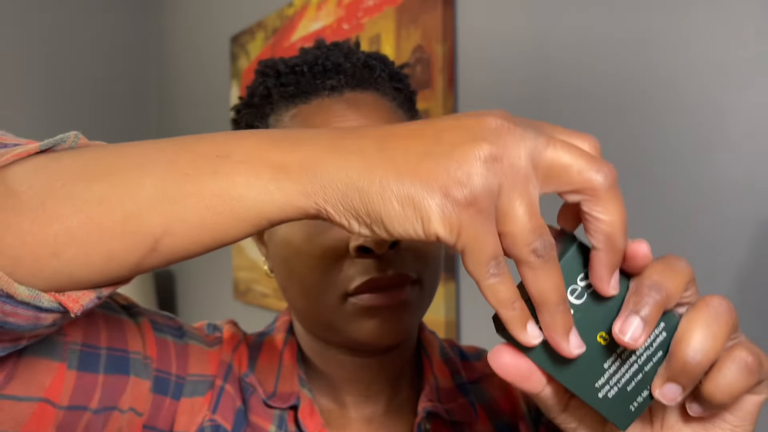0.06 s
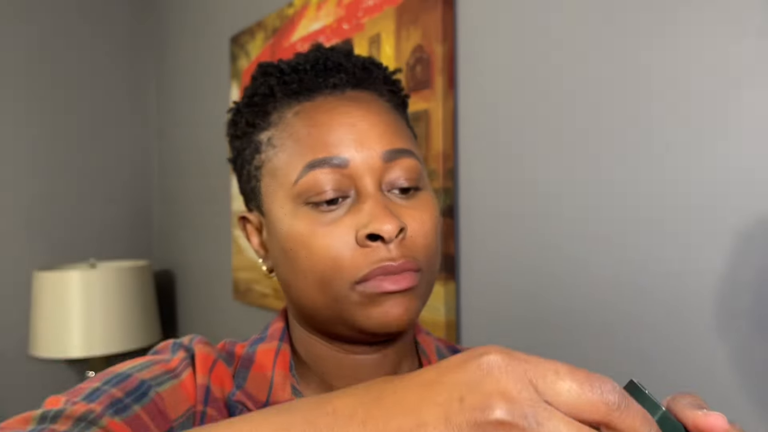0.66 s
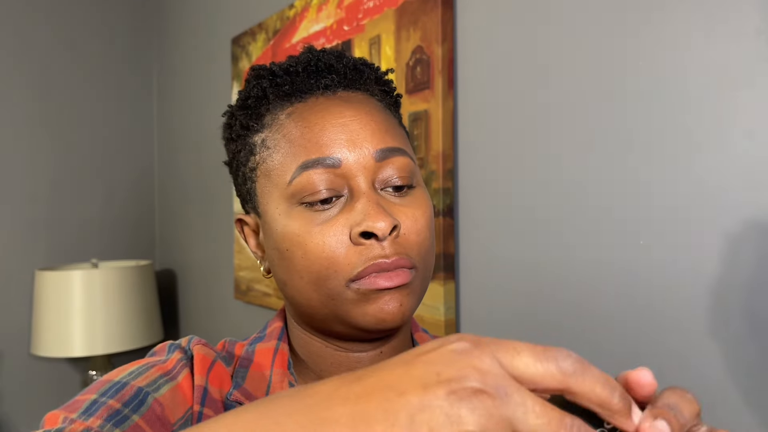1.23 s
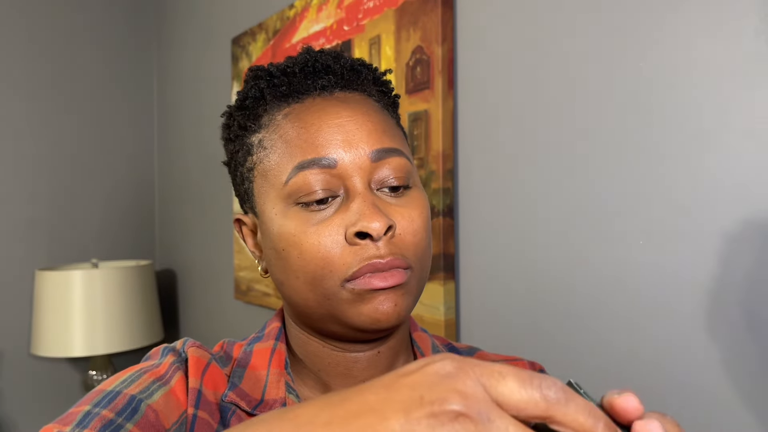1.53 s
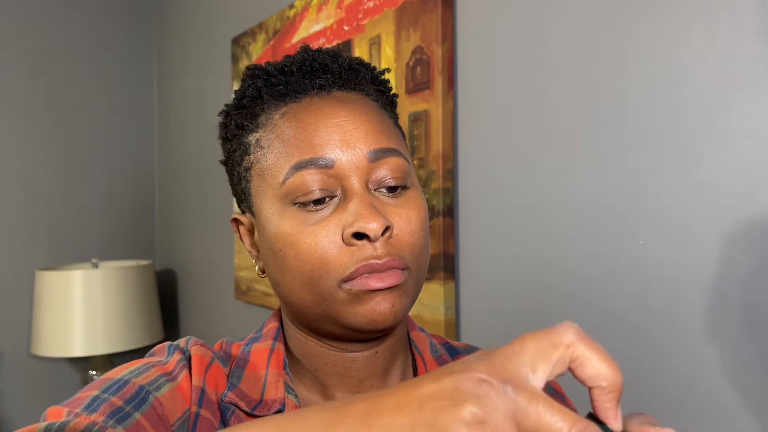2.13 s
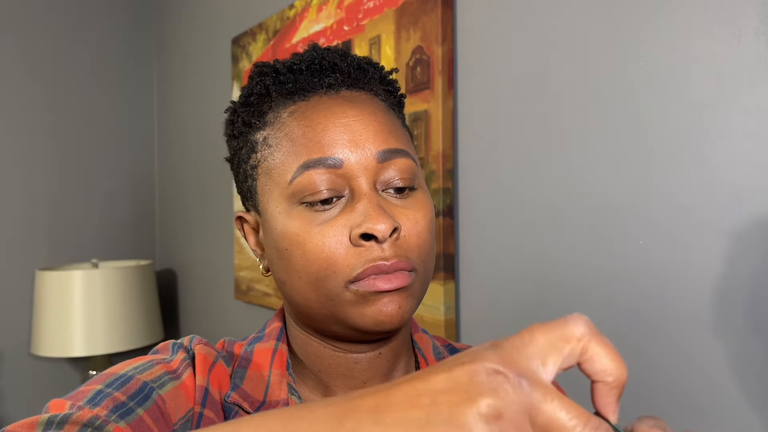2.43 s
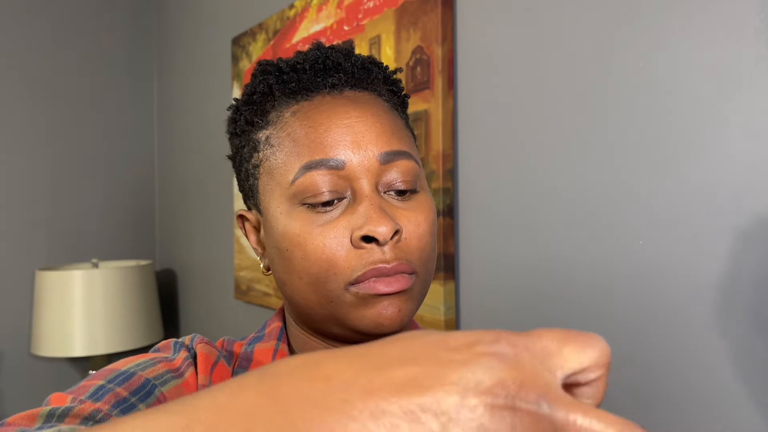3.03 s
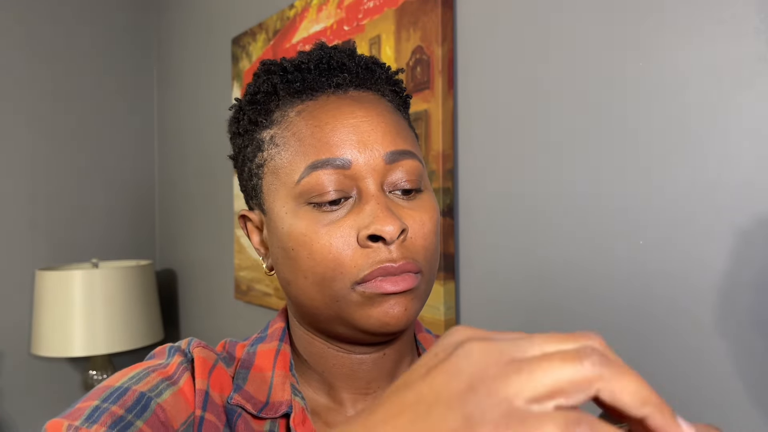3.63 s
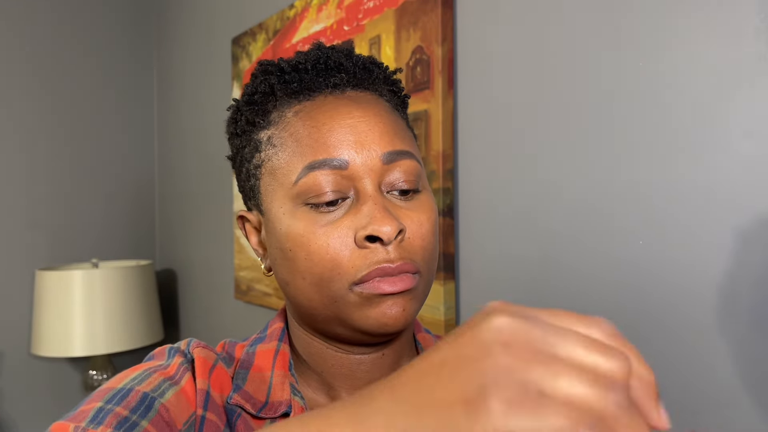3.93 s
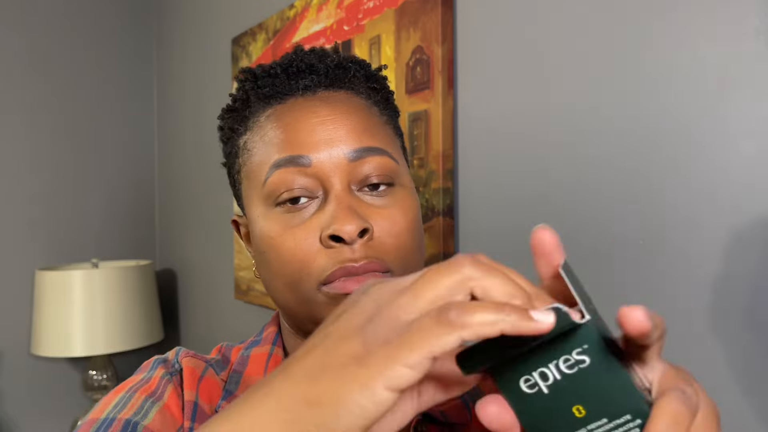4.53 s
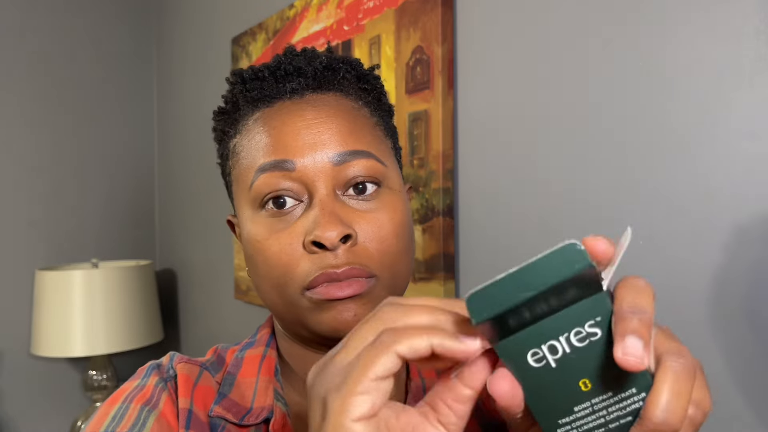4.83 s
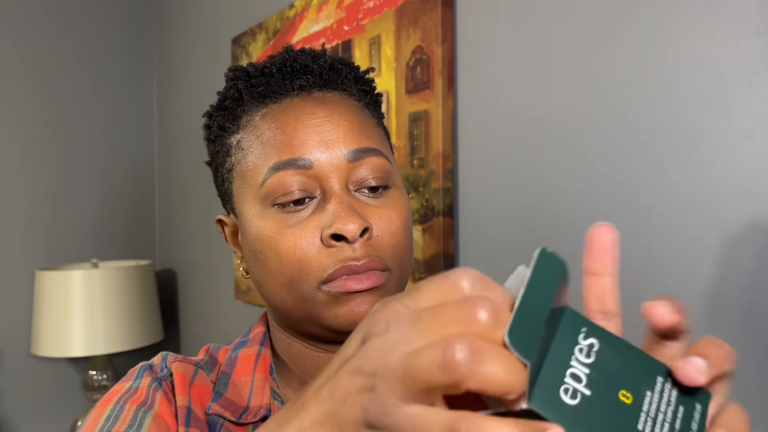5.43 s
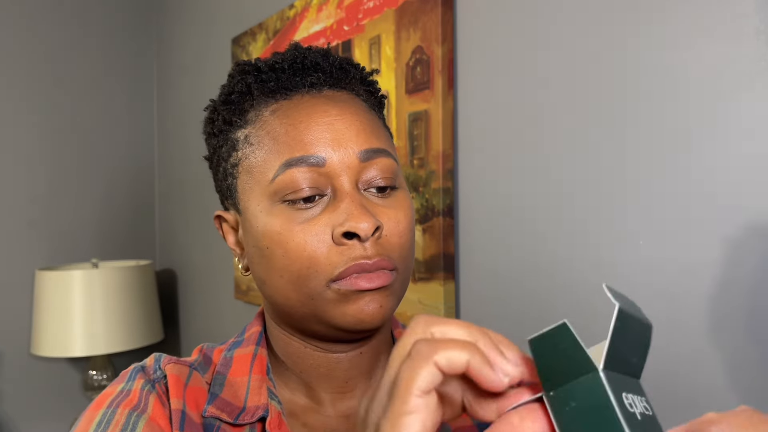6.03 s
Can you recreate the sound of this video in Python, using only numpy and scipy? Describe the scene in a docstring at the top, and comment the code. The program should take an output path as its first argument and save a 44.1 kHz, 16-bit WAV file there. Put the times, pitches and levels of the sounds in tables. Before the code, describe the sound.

Fingertips tick and slide softly on a small cardboard box, heard up close in a quiet room. Partway through, the flaps snap free with crisp, slightly hollow clicks and a tab scrapes through its slot. The handling grows busier, with papery rustling, brief squeaks, more snaps and dull bumps into a palm. The walls give a very short echo above a faint, steady low rumble.

```python
"""In a quiet furnished room, two hands work open a small cardboard box close to a phone.
Flaps snap free, tabs scrape through their slots and fingertips tap; each contact makes the stiff
panels, the cut edges and the hollow of the box ring. Sliding fingers rustle and hiss, the card
squeaks as it sticks and slips, and the box thuds softly into a palm.
The walls answer briefly, over a faint rumble of air."""
import sys
import numpy as np
from scipy import signal
from scipy.fft import rfft, irfft
from scipy.io import wavfile
from scipy.ndimage import uniform_filter1d

SR = 44100
rng = np.random.default_rng(int(sys.argv[2]) if len(sys.argv) > 2 else 0)


def output_pcm(signal):
    """Save a mono or channel-first signal as 16-bit PCM at the path in sys.argv[1].

    Samples are clipped to [-1, 1] before scaling.
    """
    pcm = np.clip(np.atleast_2d(signal).T, -1, 1) * 32767
    wavfile.write(sys.argv[1], SR, np.round(pcm).astype(np.int16))


N = 277031
TIME = np.arange(N) / SR
CONTACT_TIME = TIME[:4096]  # seconds, long enough for one contact to die away

# the tones at which the panels ring as they bend: f/Hz, width/Hz, level/dB
PANEL_TONES = [(1590, 56, -0.5), (1860, 64, -3.5), (2116, 650, -2), (2612, 73, 0), (3045, 320, 7),
               (3096, 570, 7.5), (3313, 640, 5), (3980, 330, -4), (4170, 340, -8)]


def flaps():
    """Flaps snap free and fingers tap firmly on the box."""
    # t/s, panel level/dB, f/Hz of the hollow or flap, hollow level/dB, edge level/dB
    # (the last two are relative to the panel)
    flap_snaps = [(0.2702, -56, 1620, -12, 2), (0.36, -53.5, 850, 0.5, -13),
                  (0.6105, -50.5, 830, -2.5, -9.5), (0.7265, -52.5, 910, -3.5, -5),
                  (0.9805, -41.5, 1150, -3.5, -4.5), (1.2322, -58, 690, 0.5, -2),
                  (1.3318, -44.5, 790, 2.5, -6), (1.477, -51, 390, -1, -3), (1.5933, -50, 873, 6.5, -7),
                  (2.0524, -56.5, 770, -6, -4), (2.0683, -43.5, 866, 3.5, 0),
                  (2.254, -48.5, 1100, -7, -5.5), (2.299, -59.5, 850, 4.5, -6), (2.459, -61.5, 1490, 3, 0),
                  (2.5021, -41, 1410, 3.5, -5.5), (2.5784, -30, 750, -1.5, -2.5),
                  (2.6323, -22.5, 843, -4.5, -7.5), (2.6464, -26, 876, 2.5, -7),
                  (2.9065, -21.5, 1450, -2, -8), (3.0109, -28, 815, -7, -5.5),
                  (3.1296, -42.5, 810, -9.5, -5), (3.2118, -42, 1950, -1.5, -20),
                  (3.2497, -43.5, 1400, -6, -7), (3.2813, -36.5, 1570, 3.5, -14),
                  (3.3699, -41, 1390, -4, -1.5), (3.8187, -43, 880, 3.5, -24),
                  (3.8361, -52.5, 1220, 2, -0.5), (3.9165, -26, 1455, 5.5, -2),
                  (3.9226, -25.5, 1434, -0.5, -13), (3.9388, -40, 1480, -1, -18),
                  (3.9577, -43, 1600, 3, -3.5), (4.045, -47.5, 1440, -4, -6), (4.1689, -46, 1310, -4, -1),
                  (4.3612, -42.5, 785, 1, -8.5), (4.9612, -52, 676, -1.5, -8), (5.2253, -47, 1760, 5, -10),
                  (5.3215, -29, 1436, 0, -6.5), (5.326, -52, 704, 5, 4), (5.3894, -41.5, 1140, 1, 0),
                  (5.4135, -47, 1570, -10, 1), (5.4545, -43, 1090, 1.5, -7),
                  (5.4874, -39.5, 1280, -4.5, -9), (5.528, -41.5, 657, -7, -8),
                  (5.5416, -48.5, 1660, 7, -19), (5.562, -50, 1180, 4, -3), (5.5711, -43, 1190, -6, -15),
                  (5.6583, -49.5, 1780, 5, -4), (5.6847, -50.5, 1220, 4.5, -2.5),
                  (5.9618, -51.5, 1270, 3.5, -5), (6.0539, -43, 2230, -3, -17),
                  (6.062, -38, 1520, 1, -15.5), (6.1169, -32, 2365, -1, -16),
                  (6.157, -35.5, 2250, -2.5, -10), (6.2102, -41.5, 1180, -5.5, -6.5)]
    return snaps(flap_snaps)


def snaps(rows, lead_s=0.006, kick_s=0.00008, rise_s=0.00036, crack_s=0.0024, flutter_s=0.03):
    """A fold strains, gives way with one smooth kick and cracks briefly; the flap flutters to rest."""
    out = np.zeros(N)
    t = CONTACT_TIME - lead_s
    after = np.maximum(t, 0)
    strain = undb(-14) * np.exp(-np.abs(t) / 0.002)
    kick = 3.2 * np.exp(-0.5 * ((t - rise_s) / kick_s) ** 2)
    flutter = undb(-22) * np.exp(-after / flutter_s)
    crack = (1 - np.exp(-after / rise_s)) * (np.exp(-after / crack_s) + flutter)
    for start, db, *tone in rows:
        push = kick + (strain + crack) * rng.standard_normal(len(t))
        add(out, start - lead_s, box_ring(push, db, *tone, length_s=0.01))
    return out


def scrapes(fade_s=0.0047, slips_per_s=2200):
    """A tab drags through its slot: a short, dense run of tiny slips shakes the box."""
    # t/s, length/s, panel level/dB, hollow f/Hz, hollow level/dB, edge level/dB
    # (the last two are relative to the panel)
    tab_drags = [(0.893, 0.013, -53.5, 734, 6, -4.5), (0.921, 0.12, -57, 890, 1, -17),
                 (2.078, 0.033, -51.5, 884, 5.5, -2.5), (2.306, 0.0095, -44.5, 856, 1.5, -0.5),
                 (2.867, 0.031, -34, 1440, -4, 4.5), (2.877, 0.041, -30, 1430, -7.5, -3),
                 (3.315, 0.017, -37.5, 1510, -12, -28), (3.438, 0.021, -39.5, 1390, -12, -5),
                 (4.414, 0.024, -55, 1450, 13, -3), (4.649, 0.029, -52.5, 1410, 2, 1.5),
                 (4.762, 0.017, -39, 1450, -3, -12), (5.125, 0.044, -35, 1400, -2.5, -4.5),
                 (5.976, 0.019, -47, 1390, 2, 0.5)]
    out = np.zeros(N)
    t = CONTACT_TIME
    for start, length, db, *tone in tab_drags:
        pressure = (1 - np.exp(-t / fade_s)) * np.exp(-np.maximum(t - length, 0) / fade_s)
        slips = fibre_clicks(len(t), slips_per_s, spread_db=1.2) + 0.5 * rng.standard_normal(len(t))
        add(out, start, box_ring(pressure * slips, db, *tone, length_s=length))
    return out


def box_ring(push, db, hollow_hz, hollow_db, edge_db, length_s, firm_db=-39.5):
    """A push rings the panels, the hollow or a free flap, the box's soft bulk, its edges and fibres."""
    # the tones of the cut edges and folds: f/Hz, width/Hz, level/dB
    edge_tones = [(4310, 870, -0.5), (4910, 1460, 1), (5560, 1040, 2.5), (6280, 250, -0.5),
                  (6800, 2700, -6)]
    # the finest crackle of the paper fibres: f/Hz, width/Hz, level/dB
    fibre_tones = [(8460, 1250, 11.5), (9030, 300, 4), (9000, 160, 2.5), (10700, 5400, -23.5),
                   (11530, 940, -12.5), (13900, 1200, -44.5)]
    panel = band(ring_tones(push, PANEL_TONES), 1180, 4500)
    hollow = ring(push, hollow_hz, width_hz=140) + 0.19 * band(push, 657, 2030)
    hollow = ring(hollow, hollow_hz, width_hz=1200)
    thump = ring(push, 470, width_hz=135) + 0.21 * band(push, 113, 590)
    edge = band(ring_tones(push, edge_tones), 3660, 7160)
    fibre = band(ring_tones(push, fibre_tones), 4500, 20000)
    thump_db = -17.5 - 0.4 * (db - firm_db)  # gentle touches use the soft finger pad: more thump
    fibre_db = -5 + 1.56 * edge_db  # in sharper contacts the fibres grow faster than the edges
    sound = unit(panel)
    for part, part_db in (hollow, hollow_db), (thump, thump_db), (edge, edge_db), (fibre, fibre_db):
        sound = sound + undb(part_db) * unit(part)
    return undb(db) * sound * np.sqrt(length_s * SR / len(push))  # the level counts over length_s


def sliding_fingers(card_gain, hiss_gain, catches_per_s=160):
    """Skin slides with uneven pressure, hissing on the print and catching so that the card rings."""
    # the rustle of the box under a sliding finger: f/Hz, level/dB
    rustle_curve = [(150, -9), (450, -23.5), (750, -1.5), (1100, -5.5), (1480, 9.5), (1750, 0.5), (2300, 2),
                    (3200, 5), (3900, 1), (4600, -10), (7000, -9.5), (16000, -60)]
    # the hiss of skin on the smooth print: f/Hz, level/dB
    hiss_curve = [(1000, -27), (3000, -3), (3900, -2), (4600, -12.5), (5200, -0.5), (6100, 1), (7300, -5.5),
                  (8500, -4.5), (10300, -12), (11800, -15), (15500, -23.5)]
    grip_db = 2.5 * wander(110) + 1.7 * wander(28)  # the fingertip shakes quickly and leans slowly
    catches = fibre_clicks(N, catches_per_s, spread_db=3)
    ticks = ring_tones(catches, PANEL_TONES) + 2.2 * ring(catches, 842, 103)
    ticks = unit(ticks + 1.65 * ring(catches, 1180, 220))
    rustle = unit(friction(rng.standard_normal(N), rustle_curve) + 0.54 * ticks)
    hiss = friction(rng.standard_normal(N) + 0.15 * catches, hiss_curve)
    lightness = hiss_gain ** 2 / (hiss_gain ** 2 + card_gain ** 2)
    airy_hiss = unit(band(rng.standard_normal(N), 8200, 14500))
    hiss = hiss + undb(-16) * lightness * airy_hiss  # a lighter touch sounds airier
    return card_gain * undb(grip_db) * rustle + hiss_gain * undb(grip_db / 2) * hiss


def stroke_gains(rest_card_db=-68, rest_hiss_db=-73.5, attack_share=0.25, swell_db=1.5, release_s=0.019):
    """How loud the rustle and hiss are: each stroke takes hold, grows as it presses on, and lets go."""
    # finger strokes along the box: t/s, length/s, card level/dB, hiss level/dB
    strokes = [(0, 0.026, -57, -62.5), (0.09, 0.17, -61, -62.5), (0.248, 0.19, -58.5, -57.5),
               (0.5, 0.082, -70, -61), (0.892, 0.1, -53.5, -52), (1.071, 0.11, -62.5, -55.5),
               (1.394, 0.095, -68, -65), (1.782, 0.067, -64, -52.5), (2.53, 0.032, -55, -51),
               (2.786, 0.026, -62.5, -55.5), (3.133, 0.18, -50.5, -56.5), (3.28, 0.19, -50.5, -48.5),
               (3.535, 0.061, -51.5, -56), (3.624, 0.065, -63, -62), (3.777, 0.018, -63, -62),
               (3.873, 0.045, -47, -61), (4.04, 0.15, -51, -53.5), (4.288, 0.18, -53, -59),
               (4.484, 0.2, -52.5, -50.5), (4.694, 0.11, -53, -61), (4.902, 0.099, -53.5, -54.5),
               (5.032, 0.1, -48, -58), (5.14, 0.17, -45, -56.5), (5.335, 0.28, -56.5, -63.5),
               (5.613, 0.068, -50, -56.5), (5.706, 0.15, -59, -66), (5.845, 0.092, -54, -58),
               (6.097, 0.12, -52, -53.5)]
    card_power = np.full(N, undb(rest_card_db) ** 2)  # the hands are never quite still
    hiss_power = np.full(N, undb(rest_hiss_db) ** 2)
    t = TIME[:SR // 2]
    for start, length, card_db, hiss_db in strokes:
        attack = np.minimum(t / (attack_share * length), 1) ** 0.64
        swell = undb(swell_db * (np.minimum(t / length, 1) - 1))
        release = np.exp(-np.maximum(t - length, 0) / release_s)
        shape = attack * swell * release
        add(card_power, start, (undb(card_db) * shape) ** 2)
        add(hiss_power, start, (undb(hiss_db) * shape) ** 2)
    return np.sqrt(card_power), np.sqrt(hiss_power)


def friction(noise, curve, drift_db=1.7, drifts_per_s=16):
    """Rubbing noise whose octaves each swell and fade as the finger moves over the card."""
    centres_hz = 375 * 2.0 ** np.arange(6)
    log_hz = np.log(np.maximum(np.fft.rfftfreq(N, 1 / SR), 1))
    spectrum = rfft(colour(noise, curve))
    out = np.zeros(N)
    for share in np.eye(len(centres_hz)):
        octave = irfft(spectrum * np.interp(log_hz, np.log(centres_hz), share), N)
        out += octave * undb(drift_db * wander(drifts_per_s))
    return unit(out)


def fibre_clicks(n, per_s, spread_db):
    """Fibres catch and let go: random clicks, many small and a few large."""
    when, size, sign = rng.random((3, n))
    strength = undb(spread_db * np.minimum(-np.log(1 - size), 4))
    return unit((when < per_s / SR) * np.sign(sign - 0.5) * strength)


def squeaks(width_hz=330):
    """The card sticks and slips, briefly locking onto one hoarse tone."""
    # each squeak: t/s, length/s, f/Hz, level/dB
    squeals = [(0, 0.02, 1920, -54), (0.163, 0.14, 3050, -63), (2.864, 0.042, 3310, -30.5),
               (3.009, 0.01, 4300, -37.5), (3.01, 0.019, 7350, -44.5), (3.899, 0.033, 3820, -39),
               (5.129, 0.037, 6200, -41.5), (5.211, 0.097, 1940, -49)]
    out = np.zeros(N)
    for start, length, hz, db in squeals:
        n = int(length * SR)
        slips = rng.standard_normal(SR)
        tone = ring(ring(slips, hz, width_hz), hz, 2 * width_hz)[:n]
        add(out, start, undb(db) * unit(tone * np.hanning(n) ** 0.5))
    return out


def light_taps(card_gain, taps_per_s=7, shut_hz=836, open_hz=1300, lid_opens_s=2.9):
    """Fingertips shift their grip with small random taps, which ring higher once the lid is open."""
    hollow_db, edge_db = 3, -3.5
    spacings, forces, pitches = rng.standard_normal((96, 3)).T
    gaps = np.exp(spacings / 2)
    starts = np.cumsum(gaps / gaps.mean()) / taps_per_s
    taps = []
    for start, force, pitch in zip(starts, forces, pitches):
        if start < TIME[-1]:
            rubbing_db = 20 * np.log10(card_gain[int(start * SR)])
            db = rubbing_db - 4.5 + 3.5 * force  # firmer rubbing brings louder taps
            hz = (shut_hz if start < lid_opens_s else open_hz) * np.exp(0.14 * pitch)
            taps.append((start, db, hz, hollow_db, edge_db))
    return snaps(taps)


def palm_bumps(decay_s=0.0061, bulk_hz=340):
    """The box lands in the soft palm with a short, dull thud that shakes its whole bulk."""
    # each landing: t/s, level/dB
    landings = [(2.64, -48.5), (3.917, -39), (5.3914, -50), (5.53, -55), (5.562, -51)]
    out = np.zeros(N)
    t = CONTACT_TIME
    for start, db in landings:
        thud = band(np.exp(-t / decay_s) * rng.standard_normal(len(t)), 65, 520)
        thud = thud + 1.5 * ring(thud, bulk_hz, width_hz=240)
        add(out, start, undb(db) * unit(thud) * np.sqrt(2 * decay_s * SR / len(t)))
    return out


def room(sound, build_s=0.0029, fade_60_db_s=0.31, tail_db=-10):
    """The sound arrives directly, then as a few wall echoes and a short, blurred tail."""
    # echoes from the nearby walls: delay/s, level/dB
    echoes = [(.0075, -17.5), (0.015, -33), (.025, -22), (.04, -32)]
    # the tone of the tail: f/Hz, level/dB
    tail_curve = [(100, -9), (450, 12.5), (850, 4), (1500, 5.5), (3600, 6), (6000, 8.5), (9000, 3.5),
                  (16000, 6.5)]
    t = TIME[:SR]
    tail = colour(rng.standard_normal(len(t)), tail_curve)
    tail *= undb(-60 * t / fade_60_db_s) * (1 - np.exp(-t / build_s))
    response = undb(tail_db) * tail / np.sqrt(np.sum(tail ** 2))
    response[0] += 1  # the direct sound
    for delay, db in echoes:
        response[int(delay * SR)] += undb(db)
    return signal.fftconvolve(sound, response)[:N]


def room_air(level_db=-56.5):
    """The still air of the room makes a faint, steady rumble."""
    # the tone of the air: f/Hz, level/dB
    air_curve = [(20, 0.5), (50, -9), (100, -15), (200, -20), (400, -25), (800, -26), (2000, -34),
                 (5000, -61), (10000, -43.5), (16000, -45)]
    return undb(level_db) * unit(colour(rng.standard_normal(N), air_curve))


def ring_tones(push, tones, detune=0.018, scatter_db=2.2):
    """Ring several tones at once; the grip shifts their pitch and strength a little each time."""
    out = np.zeros(len(push))
    for k, (hz, width_hz, db) in enumerate(tones):
        pitch, strength = rng.standard_normal(2)
        tone = ring(push, hz * (1 + detune * pitch), width_hz)
        out += (-1) ** k * undb(db + scatter_db * strength) * tone
    return out


def ring(x, hz, width_hz):
    """Ring at one pitch; the smaller the width, the longer it rings."""
    return signal.lfilter(*signal.iirpeak(min(hz, SR / 2 - 1), hz / width_hz, fs=SR), x)


def band(x, low_hz, high_hz):
    """Keep the part of a sound between two frequencies."""
    return signal.sosfilt(signal.butter(2, [low_hz, high_hz], "band", fs=SR, output="sos"), x)


def colour(x, curve):
    """Shape the tone of a sound with a curve of f/Hz, level/dB points."""
    hz, db = np.transpose(curve)
    log_hz = np.log(np.maximum(np.fft.rfftfreq(len(x), 1 / SR), 1))
    return irfft(rfft(x) * undb(np.interp(log_hz, np.log(hz), db)), len(x))


def wander(steps_per_s):
    """A smooth random drift with a typical size of 1."""
    hold = int(SR / steps_per_s)
    steps = np.repeat(rng.standard_normal(N // hold + 1), hold)
    return unit(uniform_filter1d(uniform_filter1d(steps, hold), hold)[:N])


def undb(db):
    """Turn decibels into a gain to multiply by."""
    return 10 ** (np.asarray(db) / 20)


def unit(x):
    """Scale a signal to an average strength (rms) of 1."""
    return x / np.sqrt(np.mean(x ** 2))


def add(out, start_s, sound):
    """Mix a sound in at the given time."""
    i = max(int(start_s * SR), 0)
    out[i:i + len(sound)] += sound[:max(N - i, 0)]


def scene():
    """The hands and the box sound in the room, over the air, in one channel."""
    air = room_air()
    card_gain, hiss_gain = stroke_gains()
    box = flaps() + scrapes() + palm_bumps() + squeaks()
    fingers = sliding_fingers(card_gain, hiss_gain) + light_taps(card_gain)
    return (room(box + fingers) + air)[None]


def record(dry):
    """The phone cuts off the highest treble."""
    top_hz = 15750
    return signal.sosfilt(signal.ellip(10, 0.2, 70, top_hz, fs=SR, output="sos"), dry)


dry = scene()
out = record(dry)
output_pcm(out)
```